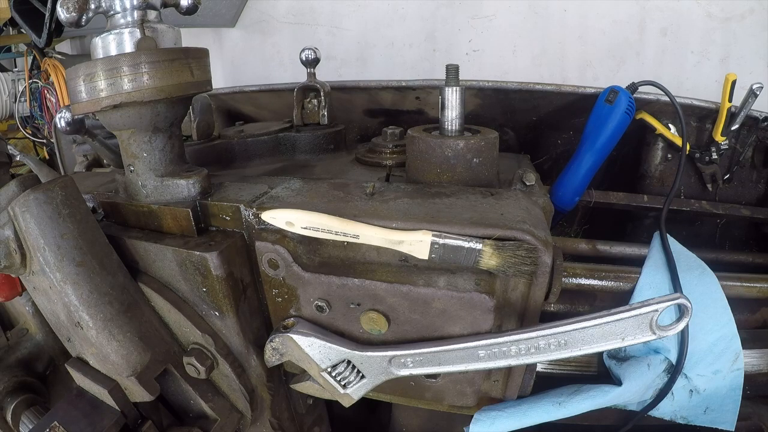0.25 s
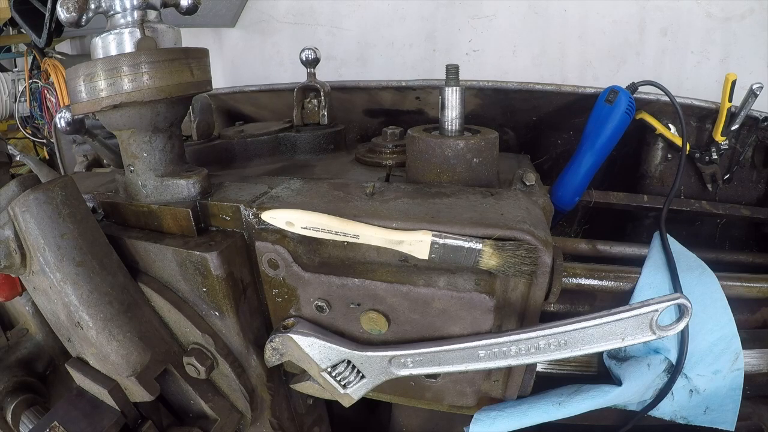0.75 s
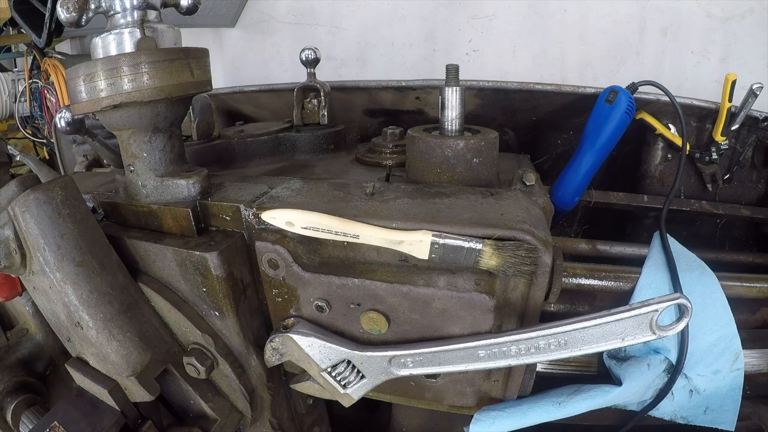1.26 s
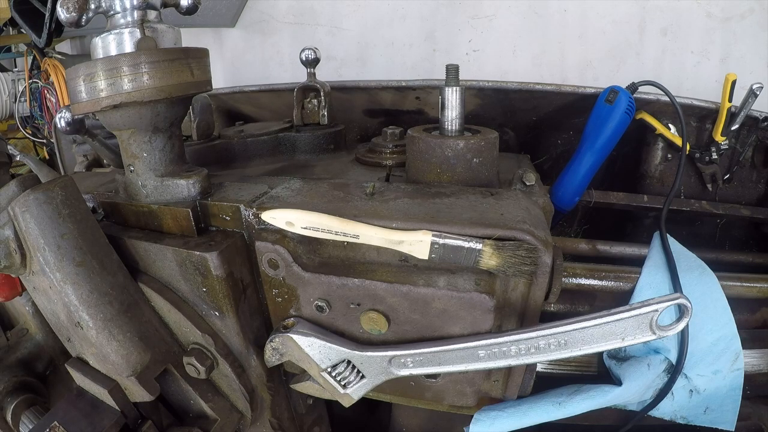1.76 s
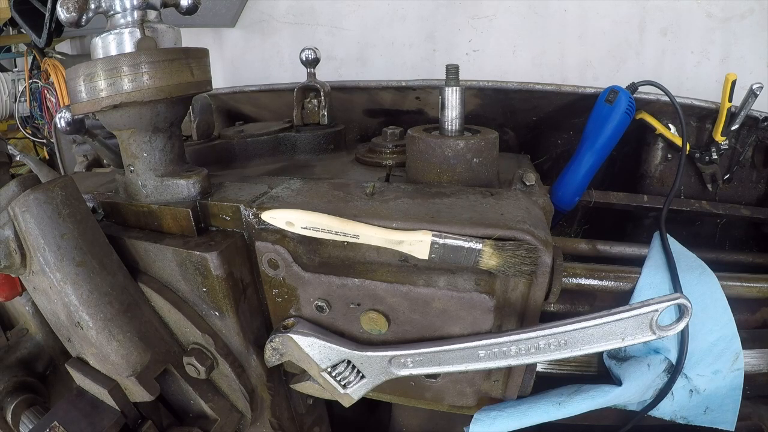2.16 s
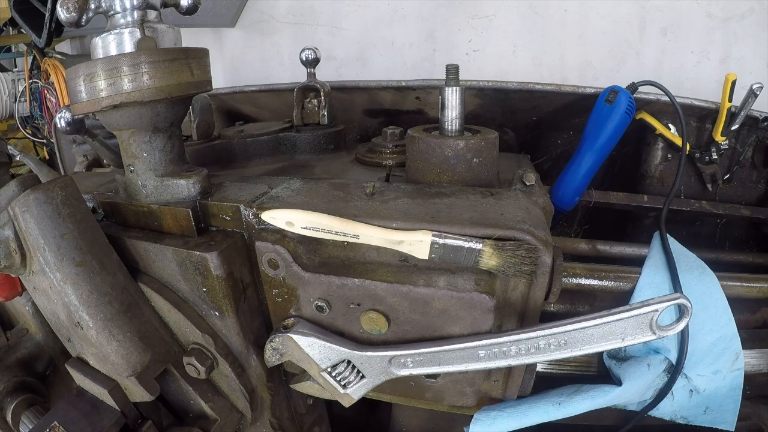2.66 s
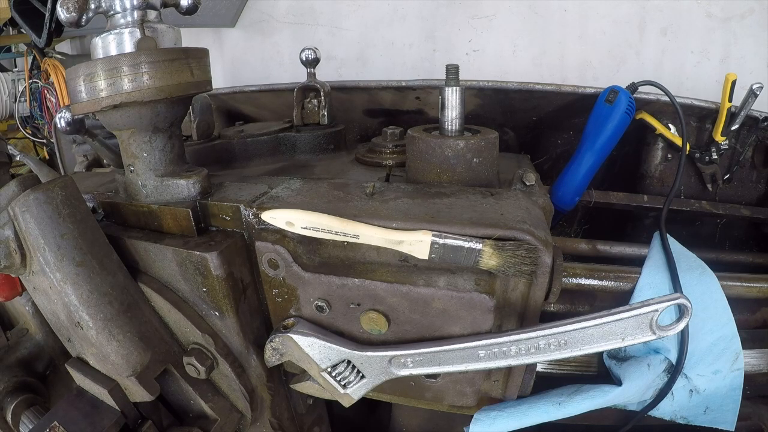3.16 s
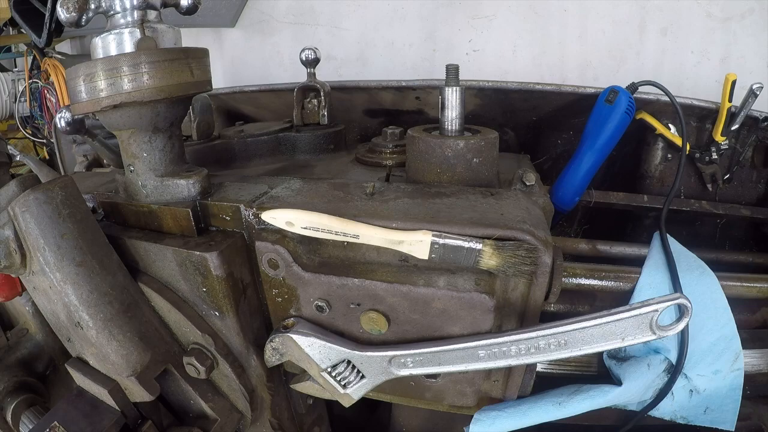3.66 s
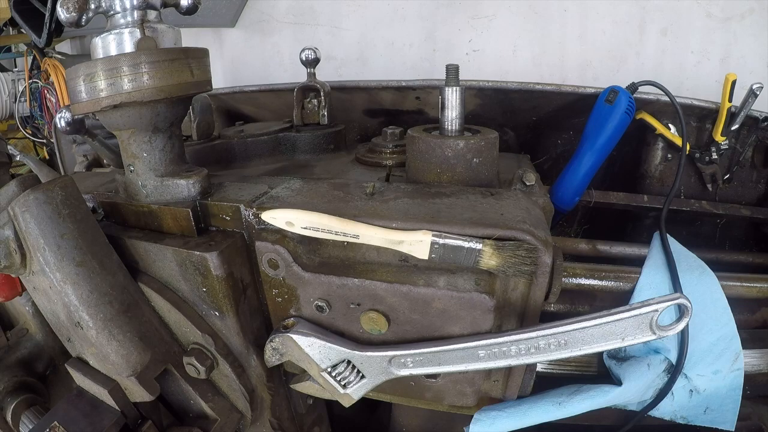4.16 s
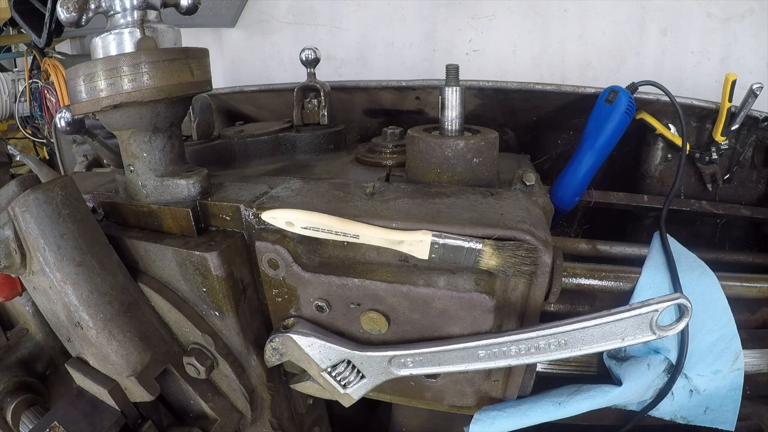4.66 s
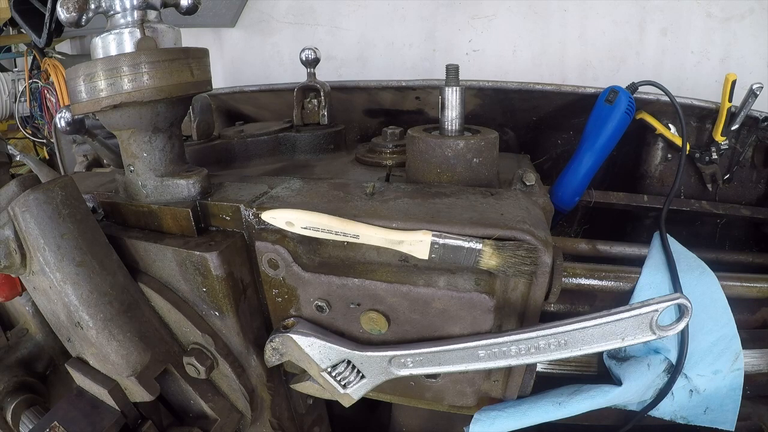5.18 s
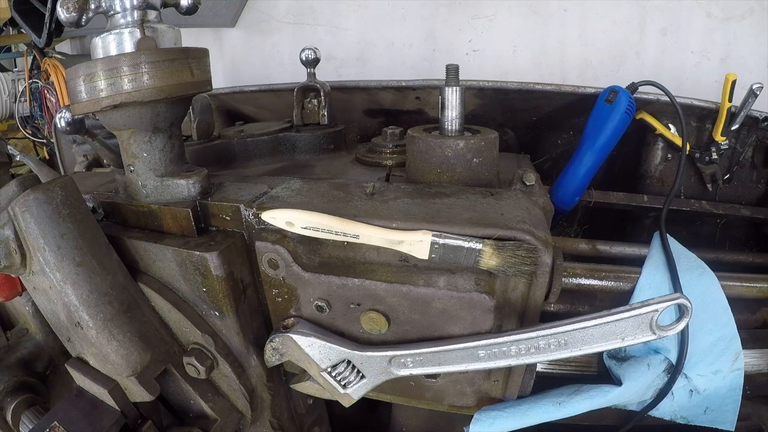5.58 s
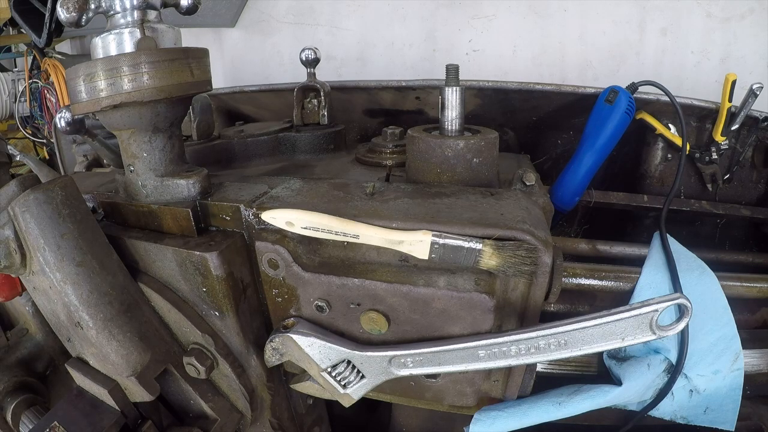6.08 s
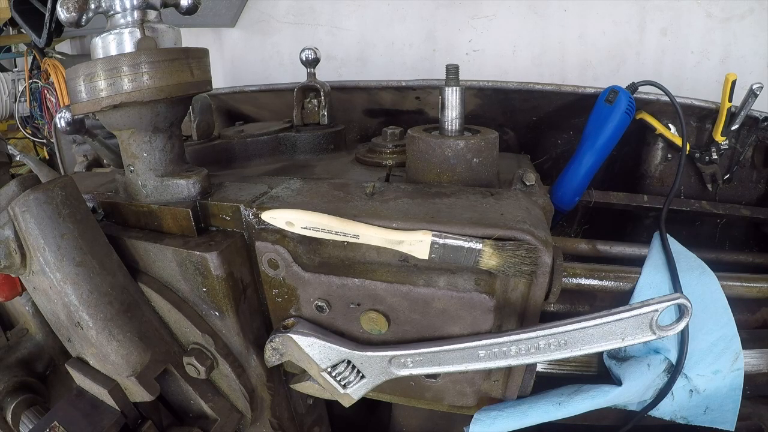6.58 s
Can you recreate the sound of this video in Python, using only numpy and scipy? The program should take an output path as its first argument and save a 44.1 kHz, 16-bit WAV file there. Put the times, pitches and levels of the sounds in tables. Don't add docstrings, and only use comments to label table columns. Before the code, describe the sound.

Metal drawer rattles and snaps shut, a pause of low fan hum, a louder booming slam with jingling tools, then soft scraping and small clinks.

```python
import sys
import numpy as np
from scipy import signal
from scipy.fft import rfft, irfft, next_fast_len
from scipy.io import wavfile
from scipy.ndimage import uniform_filter1d, map_coordinates

SR = 44100
rng = np.random.default_rng(int(sys.argv[2]) if len(sys.argv) > 2 else 0)


def pcm_store(signal):
    levels = np.round(np.clip(np.atleast_2d(signal), -1, 1) * 32767)
    wavfile.write(sys.argv[1], SR, levels.astype(np.int16).T)


def nominal_scale(level):
    x = np.asarray(level, float) / 20
    return 10 ** x


N = 301203

# [t/s, tick level/dB, clunk over tick/dB, t60/s]
KNOCKS = [(0.087, -24, -6, 0.23), (0.0932, -29.5, -2.5, 0.21), (.12, -37, -4, .15), (.134, -33, -6, .15),
          (0.2028, -14.5, -8.5, 0.19), (0.2435, -17, -4, 0.15), (0.2473, -10, -10.5, 0.14),
          (.256, -13, -10, .25), (.269, -11, -9, 0.26), (0.283, -15.5, -6, 0.16), (.3, -25, -2, .2),
          (0.3797, -32, 6, 0.26), (0.4282, -27, -7, 0.16), (.439, -28.5, -4, 0.33),
          (0.6503, -28.5, -1.5, 0.21), (0.9406, -42.5, -3, 0.23), (2.9106, -29.5, -23, 0.16),
          (3.1944, -11.5, -7.5, 0.38), (3.2273, -15, -8, 0.072), (3.24, -15, -12, .1),
          (3.367, -23, 0.5, 0.12), (3.3828, -9, -7, 0.2), (3.3918, -15, -4.5, 0.2),
          (3.4293, -26.5, 6, 0.41), (3.469, -22, -4.5, 0.23), (3.584, -34, -17, 0.09),
          (3.5939, -23.5, -10, 0.19), (3.6224, -26, -20, 0.22), (3.7673, -32.5, -2.5, 0.2),
          (3.9607, -31, 0.2, 0.46), (3.97, -32, -5, .15), (4.035, -28, -5, 0.22), (4.2586, -44, -6, 0.34),
          (4.6186, -43.5, -3, 0.2), (4.9741, -30, -15, 0.077), (5.0005, -35.5, -14, 0.2),
          (5.344, -36.5, -6, 0.46), (5.772, -44, 14, 0.083), (4.026, -35, 7, .1), (6.347, -33.5, 4.5, 0.24),
          (6.362, -40.5, 7, 0.29), (6.067, -44, 0, .1)]
# [t/s, level/dB, t60/s]
SNAPS = [(.0865, -49, .08), (0.2033, -25, 0.022), (.2445, -33, .09), (.256, -35, .09), (.283, -37, .12),
         (.6506, -54, .05), (2.9105, -51, .05), (3.194, -32, .08), (3.2278, -39, .08), (3.366, -46, .04),
         (3.3824, -26.5, .05), (3.393, -26, .09), (3.5945, -45, .04), (3.7675, -55, .05),
         (3.9609, -52, .06), (4.035, -54, .05), (4.9735, -43, .03), (5.0005, -46, .05), (5.35, -56, .08)]
# [f/Hz, density/dB per Hz]
TICK_SPECTRUM = [(1760, -18), (3000, -16.5), (3720, -12.5), (4830, -13), (6240, -6), (6850, -2.5),
                 (8270, -13.5), (9530, -14.5), (11100, -27.5), (14400, -30), (14900, -46)]
# [f/Hz, density/dB per Hz]
CLUNK_SPECTRUM = [(250, -35), (400, 2.5), (800, -1.5), (1600, -4), (2600, -0.5), (3800, -1.5), (5500, -30),
                  (8000, -71)]
# [f/Hz, density/dB per Hz]
SNAP_SPECTRUM = [(3000, -28), (7000, 9), (10000, 0), (13000, -11), (15000, -13)]
TICK_RISE_S, CLUNK_RISE_S = 0.0024, 0.0056
CLUNK_HZ, CLUNK_HZ_PER_DB = 1824, 18


def knocks():
    tick, clunk, snap = np.zeros((3, 2, N + SR))
    t = np.arange(SR // 3) / SR
    bounces = nominal_scale(2.4 * wobble(220))
    for s, db, clunk_db, t60 in KNOCKS:
        shape = nominal_scale(db - 13 - 60 * t / t60) + nominal_scale(db - 5.5 - 60 * t / 0.017)
        bright, dull = rng.standard_normal((2, 2, len(t)))
        peak = signal.iirpeak(CLUNK_HZ + CLUNK_HZ_PER_DB * db, 1.8, SR)
        dull = 0.45 * dull + 2 * signal.lfilter(*peak, dull)
        add_at(tick, s, bright * shape * (1 - np.exp(-t / TICK_RISE_S)))
        add_at(clunk, s, nominal_scale(clunk_db) * dull * shape * (1 - np.exp(-t / CLUNK_RISE_S)))
    for s, db, t60 in SNAPS:
        add_at(snap, s, nominal_scale(db - 60 * t / t60) * rng.standard_normal((2, len(t))))
    tick = coloured(bounces * tick[:, :N], TICK_SPECTRUM)
    clunk = coloured(bounces * clunk[:, :N], CLUNK_SPECTRUM)
    tick = sheet(tick, 2000, 13000, t60=0.04, ring_db=-8, count=160)
    clunk = sheet(clunk, 400, 6000, t60=0.08, ring_db=-5, count=90)
    return tick + clunk + coloured(snap[:, :N], SNAP_SPECTRUM)


def sheet(x, low_hz, high_hz, t60, ring_db, count):
    t = np.arange(SR // 6) / SR
    mode_hz = low_hz + (high_hz - low_hz) * rng.uniform(0, 1, count)
    size_db = rng.standard_normal(count)
    ring = nominal_scale(size_db) @ np.sin(2 * np.pi * np.outer(mode_hz, t)) * nominal_scale(-60 * t / t60)
    ring = ring[None] / np.linalg.norm(ring)
    return x + nominal_scale(ring_db) * signal.oaconvolve(x, ring, axes=1)[:, :N]


# [t/s, f/Hz, level/dB, t60/s, rattle over boom/dB]
THUDS = [(.0, 183, -37, 1, -0.5), (.21, 478, -29, 0.21, 7.5), (.27, 164.5, -19, 0.74, -12.5),
         (0.459, 167.8, -24, 0.75, -13), (3.396, 220, -2.5, 0.14, -21.5), (3.4, 168.7, -7.5, 0.52, -14),
         (3.411, 139.6, -15, 0.79, -18), (3.41, 244, -15.5, 0.49, -4.5), (3.43, 179.6, -6.5, 0.28, -13),
         (3.445, 228.4, -12, 0.45, -13), (3.4, 299, -16, 0.24, -3.5), (3.47, 213, -18, 0.32, -9),
         (3.964, 435, -28.5, 0.23, 0.5), (3.98, 168.3, -12.5, 0.45, -24), (4.0, 166.4, -7, 0.34, -34),
         (3.999, 228, -21, 0.36, -13), (6.37, 155.4, -20.5, 0.48, -14.5)]
# [f/Hz, density/dB per Hz]
RATTLE_SPECTRUM = [(120, -51), (200, 11.5), (300, -1.5), (500, -2.5), (900, -13), (1600, -20), (3000, -73)]
# [f/Hz, correlation/1]
NEAR_ALIKE = [(60, 1.0), (130, 0.95), (290, 0.99), (630, 0.61), (1380, 0.18), (3020, 0.75), (6620, 0.32),
              (14500, -0.38)]


def cabinet():
    boom, shake = np.zeros(N + SR), np.zeros((2, N + SR))
    t = np.arange(SR // 2) / SR
    for s, hz, db, t60, rattle_db in THUDS:
        fade = nominal_scale(db - 60 * t / t60) * (1 - np.exp(-t * hz / 0.5))
        add_at(boom, s, fade * np.sin(2 * np.pi * hz * t))
        add_at(shake, s, fade * nominal_scale(rattle_db) * rng.standard_normal((2, len(t))))
    return boom[:N] + paired(coloured(shake[:, :N], RATTLE_SPECTRUM), NEAR_ALIKE)


# [t/s, f/Hz, level/dB, t60/s, right lead over left/rad]
RINGS = [(.203, 6730, -13, 0.04, 1.3), (.256, 6760, -22, .09, .6), (3.384, 3720, -27, .04, .6),
         (3.396, 3150, -21, 0.067, .6), (3.205, 1480, -29.5, 0.073, .6), (3.424, 3200, -30, .05, .6),
         (.43, 1250, -38, .15, .4), (6.352, 1680, -42.5, 0.32, 0.76), (0.246, 6680, -23.5, 0.23, .6),
         (0.246, 1850, -26, 0.1, .5), (.247, 3750, -29, .12, .5), (.28, 3680, -31, 0.22, .5),
         (.375, 1374, -37, 0.25, 0.4), (.44, 746, -36, 0.076, .3), (.655, 5210, -50, .12, 0.46),
         (3.963, 5556, -45, .08, 0.68), (3.963, 7246, -44, .12, .6), (3.965, 5954, -46, .2, .6),
         (3.385, 3250, -25.5, 0.07, 0.57), (3.385, 806, -21.5, .09, 0.81), (3.39, 585, -29, 0.3, 0.33),
         (3.395, 490, -27, 0.27, 0.38), (3.773, 3993, -43, 0.066, .5), (4.037, 1405, -32.5, 0.064, 0.57),
         (5.772, 1111, -41, 0.079, 0.92), (5.775, 1552, -40, 0.076, 0.97), (6.15, 548.2, -45.5, 1, 0.094),
         (6.35, 1573, -43, 0.18, 0.73), (6.352, 1746, -40, 0.19, 1.3), (6.351, 1950, -42, 0.25, 0.88),
         (6.355, 2340, -46, .18, 0.92), (6.355, 1130, -48, 0.18, .8), (6.352, 765, -45, .2, .5),
         (3.2, 1650, -30, .1, .6), (3.202, 7300, -24, .05, .8), (3.228, 3500, -27, .1, .6),
         (3.4, 660, -28.5, 0.22, 0.44), (3.4, 960, -29, 0.16, 0.61), (3.395, 1250, -32, 0.13, .5),
         (3.58, 1330, -47.5, .5, .5)]
ROD_HZ = 6023, 8897, 11018, 12440, 13000, 13460, 13680
# [t/s, level/dB, t60/s, right lead over left/rad]
ROD_HITS = [
    [(3.581, -32, .12, 1.7), (3.597, -35, .12, 1.4), (3.623, -33, .12, 1.2), (3.645, -40, .38, 1.2)],
    [(.335, -43, .38, .4), (3.122, -42, .2, 1.2), (3.623, -37, .33, .6)],
    [(3.51, -48, .8, 2.8), (3.58, -47, .5, 2.1), (3.623, -47, .3, 2.1)],
    [(3.5, -58, .1, 2), (3.55, -60, .15, 2), (3.583, -61, .2, 2)],
    [(3.583, -60, .25, 2), (3.63, -62, .4, 2)],
    [(3.5, -60, .1, 2), (3.585, -60, .25, 2)],
    [(3.626, -58, .2, 2)],
]
SPANNER_HZ = 4517, 6095, 7262, 9450, 10055, 11960, 14020, 14370
# [t/s, level/dB, t60/s, right lead over left/rad]
SPANNER_HITS = [
    [(4.038, -47, .22, .2)],
    [(.939, -54, .35, .6), (4.036, -42, .33, 1.5)],
    [(3.99, -46, .3, .7), (4.035, -32, .06, .7), (4.036, -35, .25, .7)],
    [(4.062, -50, .24, .8)],
    [(4.036, -52, .22, .6)],
    [(4.045, -61, .2, .6)],
    [(4.033, -58, .05, .6)],
    [(4.042, -64, .2, .6)],
]
FLUTTER_DB, SLIP_RAD, FLUTTER_RATE_HZ = 3, 0.45, 70


def tools():
    ring = np.zeros((2, N + SR))
    t = np.arange(SR * 3 // 4) / SR
    struck = list(RINGS)
    for hz, hits in zip(ROD_HZ + SPANNER_HZ, ROD_HITS + SPANNER_HITS):
        struck += [(s, hz, *how) for s, *how in hits]
    for s, hz, db, t60, lead_rad in struck:
        knots = rng.standard_normal((2, 60))
        sway, slip = (map_coordinates(k, [t * FLUTTER_RATE_HZ]) for k in knots)
        fade = nominal_scale(db - 60 * t / t60 + FLUTTER_DB * sway) * (1 - np.exp(-t / 0.00049))
        phase = 2 * np.pi * hz * t + SLIP_RAD * slip + np.array([[0], [lead_rad]])
        partner = 0.28 * np.sin(phase * (1.003 + 0.004 * rng.uniform(0, 1)))
        add_at(ring, s, fade * (np.sin(phase) + partner))
    return ring[:, :N] * nominal_scale(1.2 * wobble(150))


# [t/s, length/s, fizz level/dB, drag over fizz/dB]
STROKES = [(-.08, 0.27, -46, 0.5), (.29, 0.05, -40.5, 11), (0.395, 0.12, -56, 3), (3.108, 0.12, -45.5, 3.5),
           (3.244, 0.026, -45, 3), (3.303, 0.12, -40.5, 3), (3.498, 0.13, -44.5, -4),
           (4.78, 0.11, -51.5, -1), (5.426, 0.15, -54.5, -4), (5.53, 0.12, -48.5, -5),
           (5.639, 0.26, -35.5, -14.5), (5.892, 0.18, -34.5, -15), (5.945, 0.15, -48.5, 1),
           (6.082, .04, -59, -10), (6.117, 0.2, -64.5, 13)]
# [f/Hz, density/dB per Hz]
FIZZ_SPECTRUM = [(1760, -8.5), (3000, -5.5), (4870, -5), (6160, 2), (7180, 0), (9920, -13.5), (11400, -31),
                 (12900, -21), (14900, -43)]
# [f/Hz, density/dB per Hz]
DRAG_SPECTRUM = [(500, -12), (1000, 1.5), (2000, -0.5), (3000, -5.5), (4200, -10), (6000, -21), (9000, -78)]
RISE_SHARE, SAG_DB, FADE_T60_S = 0.32, 3.5, 0.24


def slides():
    fizz, drag, t = np.zeros(N), np.zeros(N), np.arange(N) / SR
    for s, length, db, drag_db in STROKES:
        rise = np.clip((t - s) / (RISE_SHARE * length), 0, 1)
        sag_db = SAG_DB * np.clip((t - s) / length - RISE_SHARE, 0, 1)
        fade_db = 60 * np.clip(t - s - length, 0, 1) / FADE_T60_S
        push = rise * nominal_scale(db - sag_db - fade_db)
        fizz += push
        drag += nominal_scale(drag_db) * push
    fine = unit(coloured(grit(), FIZZ_SPECTRUM))
    coarse = unit(coloured(grit(), DRAG_SPECTRUM))
    return fizz * fine + nominal_scale(-1.5) * drag * coarse


def grit():
    return patchy(depth_db=1.6) * nominal_scale(1.6 * wobble(900))


def patchy(depth_db):
    z = signal.stft(rng.standard_normal((2, N)), nperseg=256)[2]
    field = uniform_filter1d(rng.standard_normal(z.shape[1:]), size=6, axis=0)
    field = uniform_filter1d(field, size=9, axis=1)
    return signal.istft(z * nominal_scale(depth_db * unit(field)), nperseg=256)[1][:, :N]


# [f/Hz, t60/s]
WALLS_T60 = [(200, 0.71), (2000, 0.57), (7000, 0.4), (13000, 0.2)]


def walls(x):
    hz, t, z = signal.stft(rng.standard_normal((2, SR * 3 // 4)), SR, nperseg=256)
    decay = nominal_scale(-60 * t / along(WALLS_T60, hz)[:, None])
    tail = signal.istft(z * decay, SR, nperseg=256)[1]
    late = np.pad(x, ((0, 0), (400, 0)))
    return signal.fftconvolve(late, tail / np.linalg.norm(tail[0]), axes=1)[:, :N]


# [middle t/s, length/s, level/dB, f/Hz]
SWELLS = [(0.084, 0.2, -16, 57.1), (0.31, 0.18, -25, 55.7), (0.557, 0.12, -20.5, 60.7),
          (0.683, 0.082, -14, 62.3), (0.854, 0.069, -17.5, 63.7), (1.002, 0.14, -18.5, 59),
          (1.245, 0.16, -18.5, 60.6), (1.465, 0.25, -11.5, 58.65), (1.702, 0.24, -12.5, 57.65),
          (2.016, 0.12, -19, 63.4), (2.18, 0.1, -22, 60.3), (2.34, 0.11, -18, 59.3),
          (2.596, 0.18, -16.5, 58.45), (2.834, 0.27, -24, 61.2), (3.025, 0.11, -28, 56.6),
          (3.173, 0.09, -18, 55.5), (3.373, 0.067, -13, 56.52), (3.627, 0.35, -25, 59),
          (3.885, 0.1, -25, 60.8), (4.127, 0.51, -25, 57.16), (4.547, 0.31, -26.5, 57.25),
          (4.886, .35, -22.5, 64.95), (5.223, 0.081, -28, 64), (5.403, 0.16, -22.5, 61.66),
          (5.67, .2, -35, 60.25), (5.808, 0.083, -22.5, 56.2), (6.197, 0.32, -26, 62.08),
          (6.315, .08, -28, 62), (6.567, 0.26, -26, 61), (6.82, 0.19, -19, 57.8)]
# [middle t/s, length/s, level/dB]
UPPER_SWELLS = [(.3, 1, -26), (.8, 0.9, -31), (1.4, 0.92, -27.5), (1.84, 0.15, -23.5), (2.6, 1, -26),
                (2.98, 0.29, -21), (3.32, 0.17, -22.5), (3.65, 0.31, -32), (3.88, 0.28, -25.5),
                (4.43, 0.52, -25.5), (4.97, 0.16, -22), (5.42, 0.38, -28), (6.28, 0.096, -37)]
# [t/s, level/dB]
FAN = [
    (0, -31.5),
    (1, -33.5),
    (1.9, -34.5),
    (3, -34),
    (3.3, -31.5),
    (3.8, -35.5),
    (4.4, -34.5),
    (6.83, -36),
]
# [f/Hz, density/dB per Hz]
RUMBLE_SPECTRUM = [(12, -41), (20, -8), (32, -5.5), (49, -4), (70, -12), (92, -10.5), (125, -6.5),
                   (151, -13.5), (185, -11), (321, -19.5), (357, -29), (398, -27), (500, -49), (650, -58),
                   (1100, -120)]
# [f/Hz, correlation/1]
ALIKE = [(60, 1.0), (130, 0.96), (290, 0.99), (630, 0.16), (1380, -0.3), (3020, 0.4), (6620, -0.079),
         (14500, 0.03)]


def hum():
    pitch_hz, = curves([(s, hz) for s, _, _, hz in SWELLS])
    level = np.sqrt(2) * swells(SWELLS) * nominal_scale(0.26 * wobble(7.9))
    tone = level * np.sin(2 * np.pi * np.cumsum(pitch_hz) / SR)
    restless = nominal_scale(-31) * resonance(60, 6)
    upper = nominal_scale(-1.5) * swells(UPPER_SWELLS) * resonance(82, 7)
    rumble_db, = curves(FAN)
    rumble = unit(paired(coloured(rng.standard_normal((2, N)), RUMBLE_SPECTRUM), ALIKE))
    return tone + restless + upper + nominal_scale(rumble_db + 8) * rumble


def resonance(centre_hz, half_width_hz):
    return unit(filtered(rng.standard_normal(N), lambda hz: 1 / (1 + ((hz - centre_hz) / half_width_hz) ** 2)))


def swells(rows):
    t = np.arange(0, N + 64, 64) / SR
    power = sum(nominal_scale(2 * db) * np.exp(-7.5 * ((t - s) / length) ** 2) for s, length, db, *_ in rows)
    return np.interp(np.arange(N) / SR, t, np.sqrt(power))


# [f/Hz, density/dB per Hz]
AIR_SPECTRUM = [(180, -17), (300, -17), (320, -5), (359, -12), (403, -9.5), (626, -17), (883, -13.5),
                (958, -17.5), (1310, -16.5), (1730, -24.5), (2280, -25.5), (3060, -33.5), (8430, -36),
                (13500, -50.5), (14900, -58)]


def air():
    whine = lambda hz: 1 + 0.21 / (1 + ((hz - 8560) / 90) ** 2)
    hiss = filtered(coloured(rng.standard_normal((2, N)), AIR_SPECTRUM), whine)
    drift_db = 0.3 * wobble(3)
    return nominal_scale(-41 + drift_db) * unit(paired(hiss, ALIKE))


def add_at(track, s, x):
    track[..., round(s * SR):][..., :x.shape[-1]] += x


def unit(x):
    return x / np.sqrt(np.mean(x ** 2) + 1e-20)


def along(points, hz):
    f, v = np.transpose(points)
    return np.interp(np.log(hz + 1), np.log(f + 1), v)


def curves(rows):
    s, *cols = np.transpose(rows)
    return [np.interp(np.arange(N) / SR, s, c) for c in cols]


def wobble(rate_hz):
    return map_coordinates(rng.standard_normal(int(N * rate_hz / SR) + 4), [np.arange(N) * rate_hz / SR])


def filtered(x, response):
    m = next_fast_len(N + 8192)
    return irfft(rfft(x, m) * response(np.fft.rfftfreq(m, 1 / SR)), m)[..., :N]


def coloured(x, spectrum):
    return filtered(x, lambda hz: unit(nominal_scale(along(spectrum, hz))))


def paired(two, alike):
    turn = lambda hz: np.arccos(np.clip(along(alike, hz), -1, 1)) / 2
    mid, side = filtered(two, lambda hz: np.array([np.cos(turn(hz)), np.sin(turn(hz))]))
    return np.array([mid + side, mid - side])


def scene():
    moved = paired(knocks() + slides(), NEAR_ALIKE)
    rings = tools()
    room = nominal_scale(-9) * paired(walls(moved + nominal_scale(-4.5) * rings), ALIKE)
    return moved + rings + room + cabinet() + hum() + air()


def top_cut(x):
    return signal.sosfilt(signal.butter(12, 15120, fs=SR, output="sos"), x)


# [f/Hz, left over right/dB]
PORTS = [(60, 0), (200, 0), (370, .5), (690, -3.2), (1260, -3.5), (2330, -2.5), (4280, -1.2), (7880, -2.8),
         (14500, -.5)]


def record(dry):
    sides = np.array([[0.5], [-0.5]])
    heard = filtered(dry, lambda hz: nominal_scale(along(PORTS, hz) * sides) * (hz < 15120))
    heard = heard / (1 + np.abs(heard / 0.95) ** 6) ** (1 / 6)
    return top_cut(heard)


dry = scene()
out = record(dry)
pcm_store(out)
```